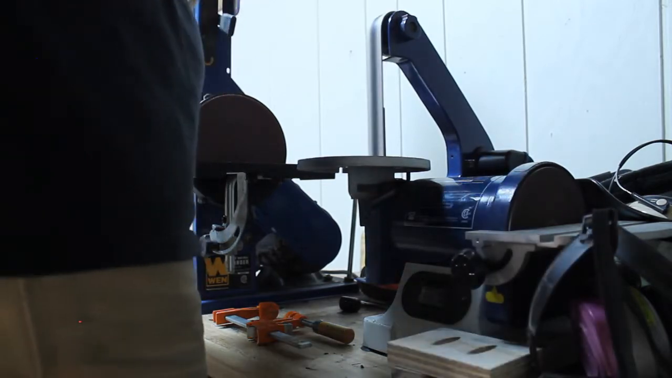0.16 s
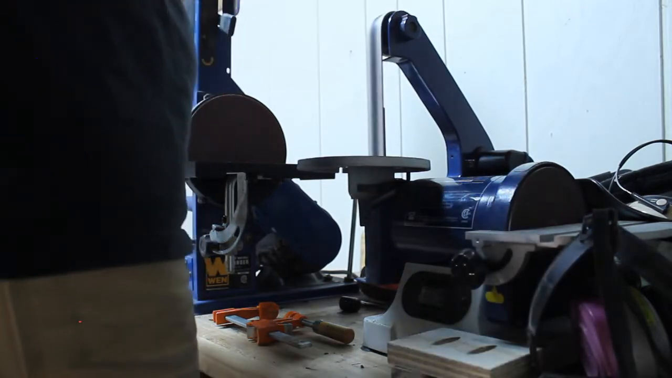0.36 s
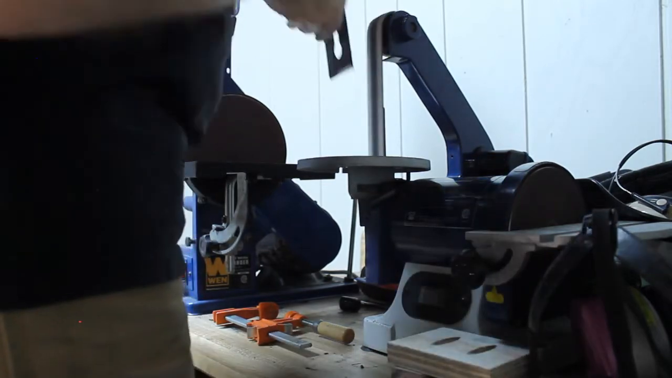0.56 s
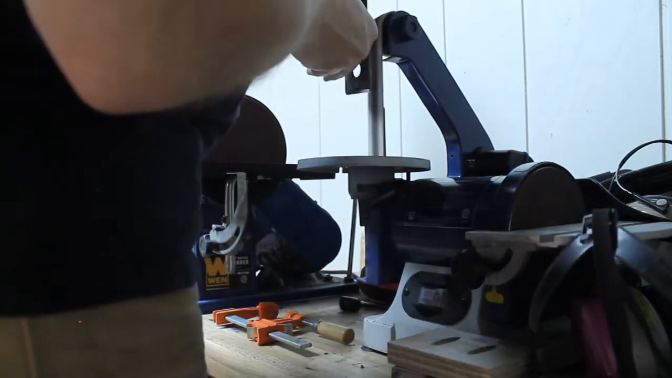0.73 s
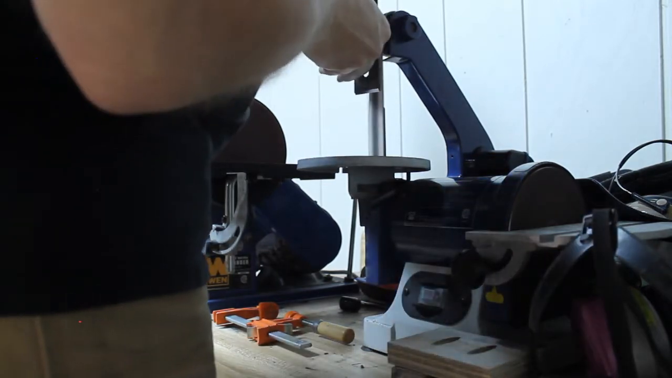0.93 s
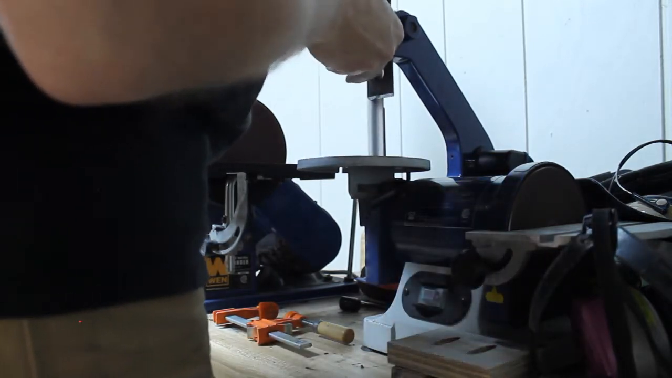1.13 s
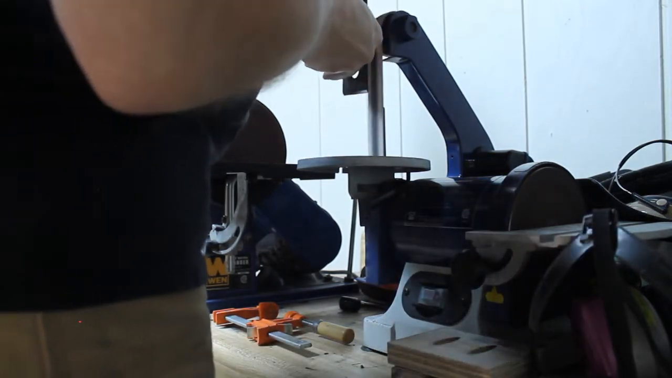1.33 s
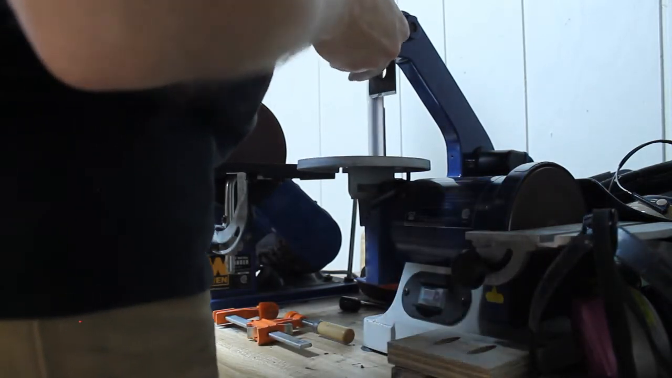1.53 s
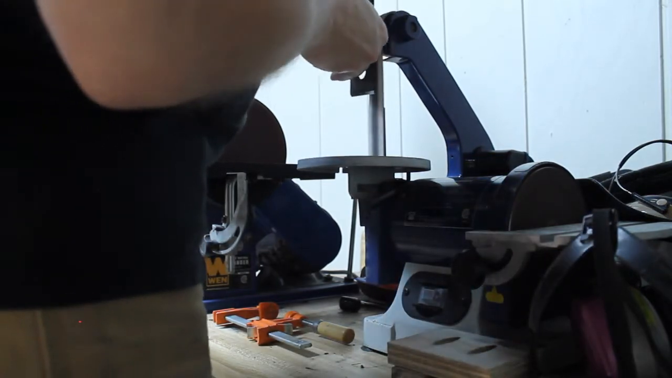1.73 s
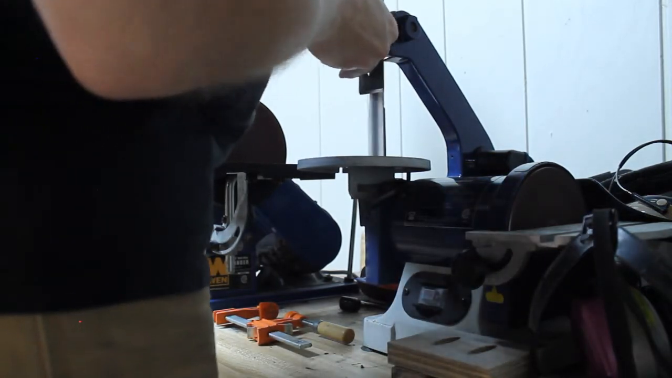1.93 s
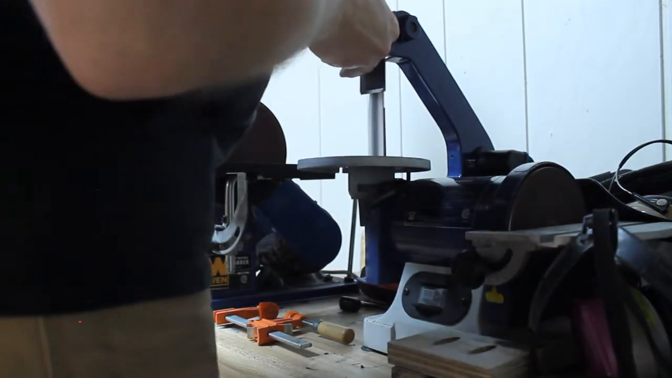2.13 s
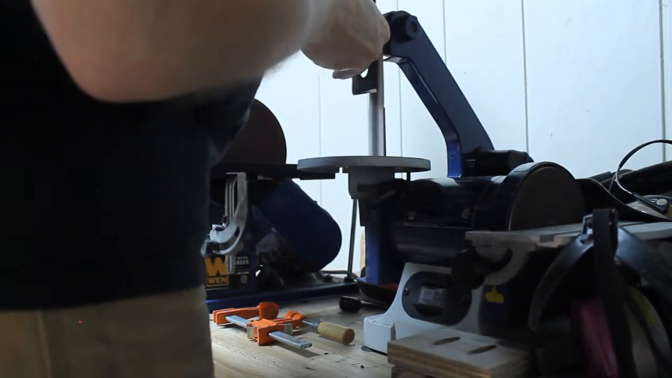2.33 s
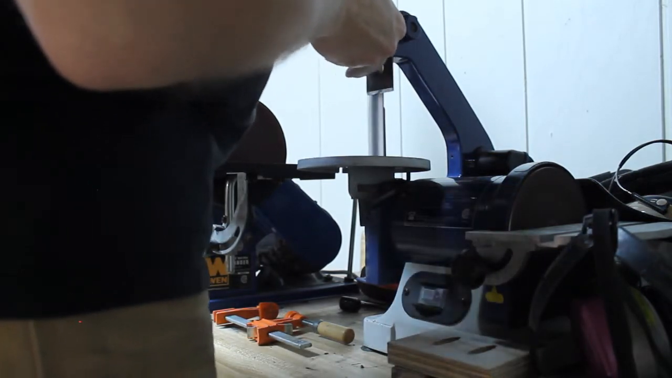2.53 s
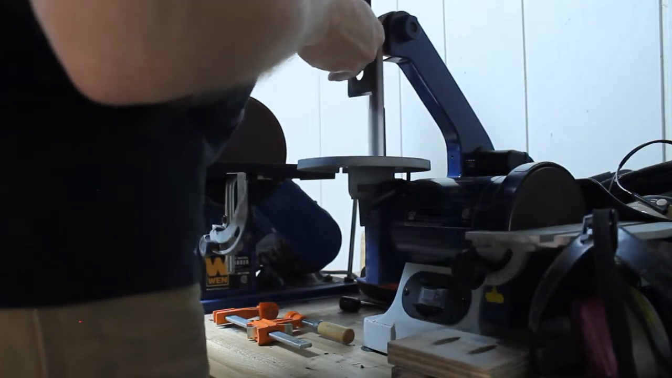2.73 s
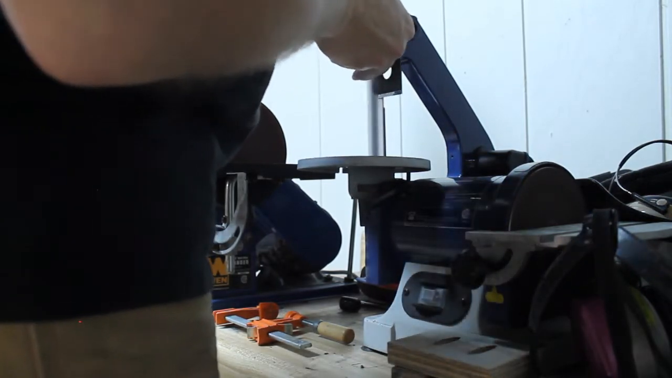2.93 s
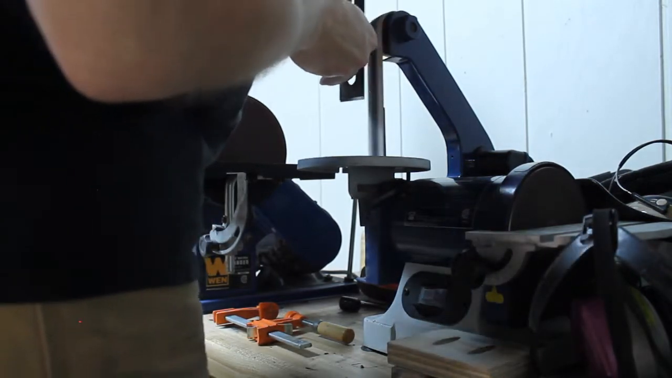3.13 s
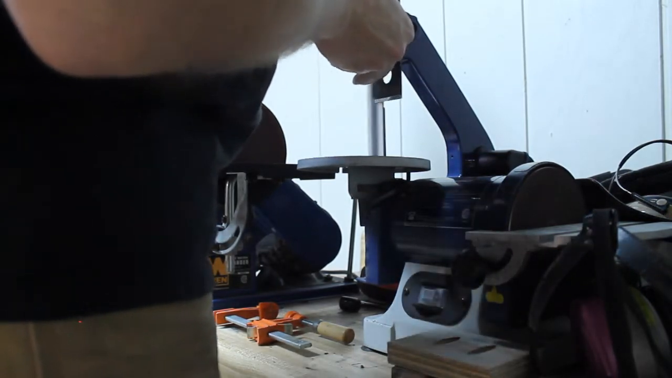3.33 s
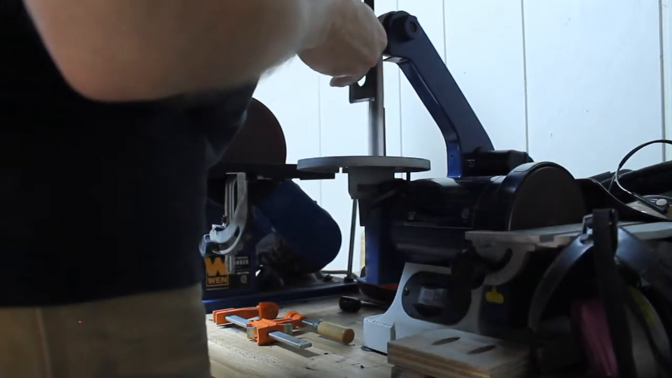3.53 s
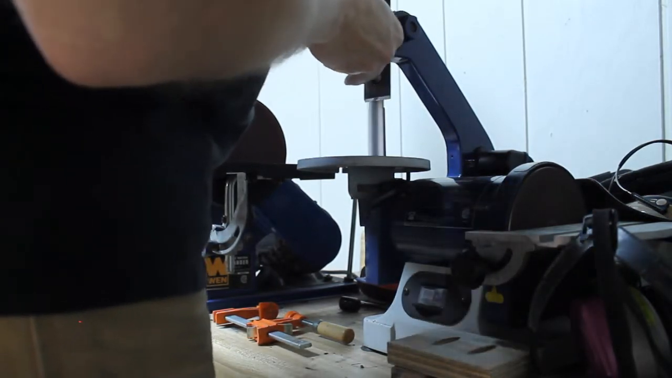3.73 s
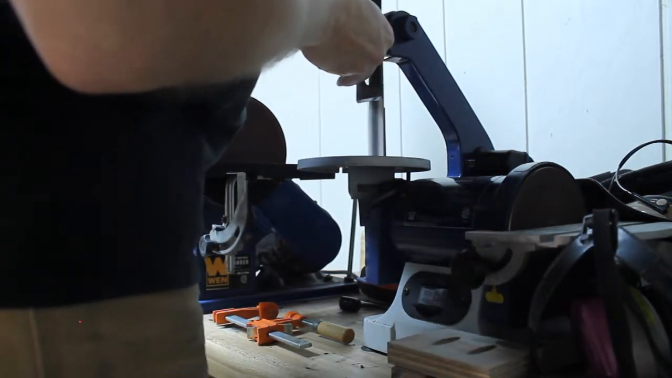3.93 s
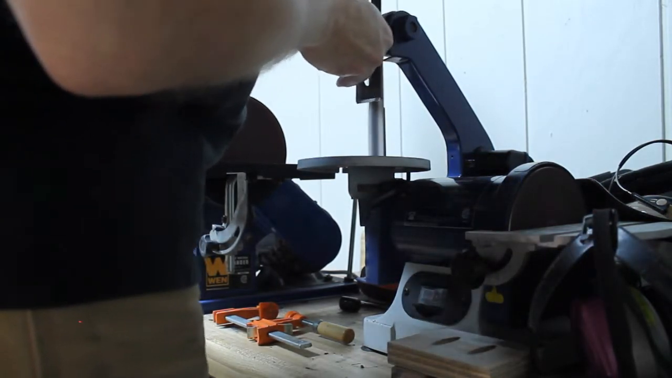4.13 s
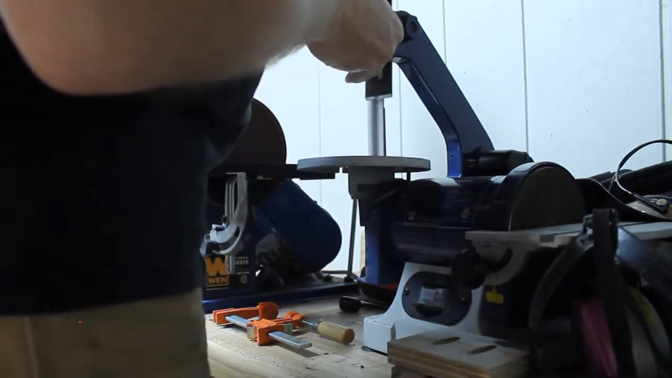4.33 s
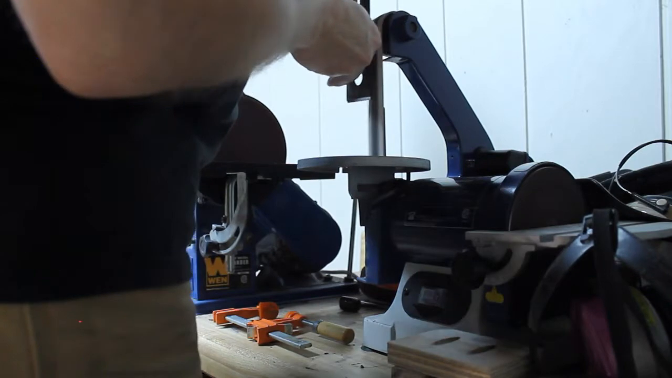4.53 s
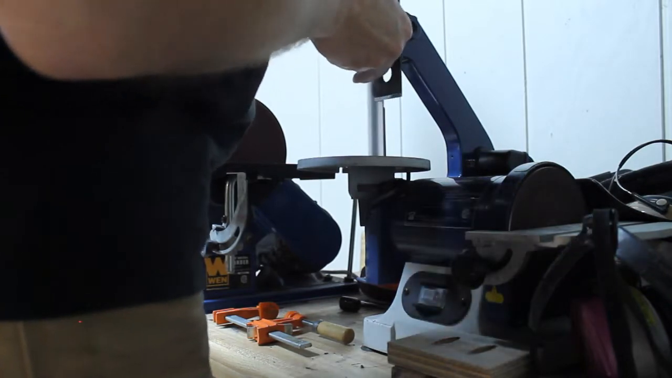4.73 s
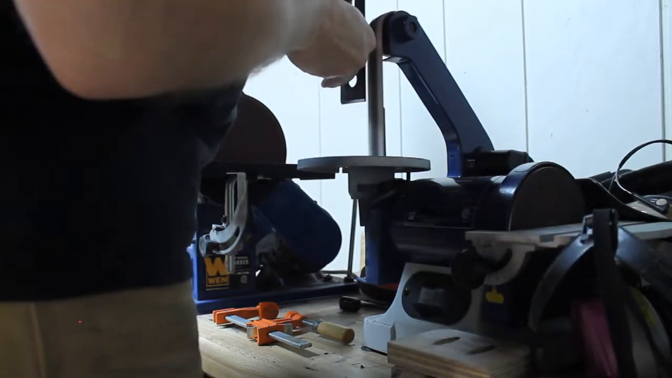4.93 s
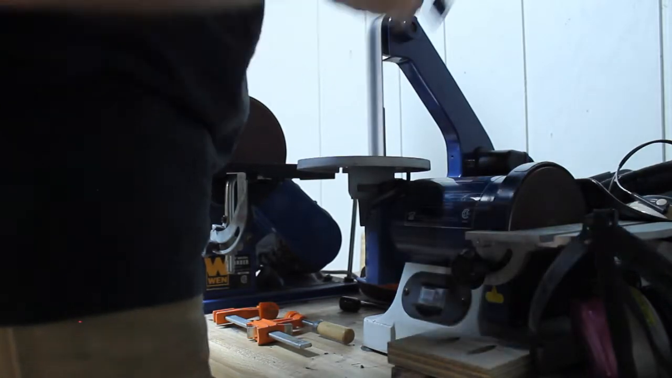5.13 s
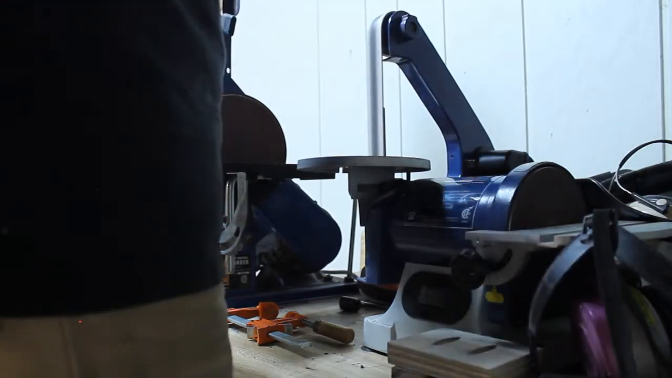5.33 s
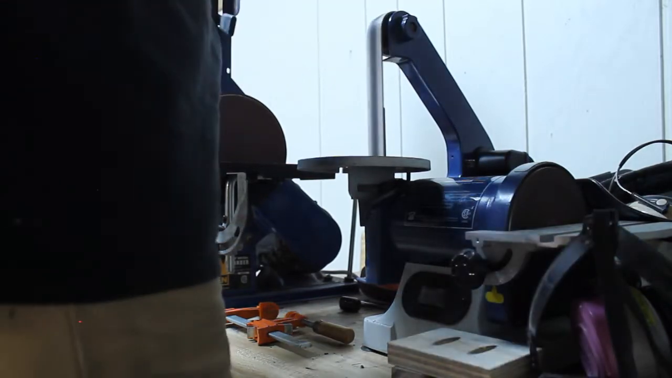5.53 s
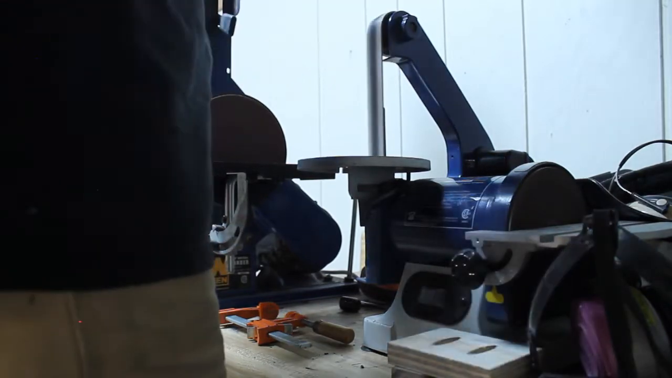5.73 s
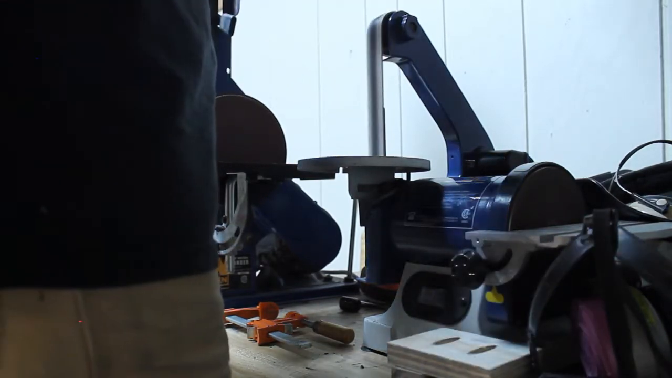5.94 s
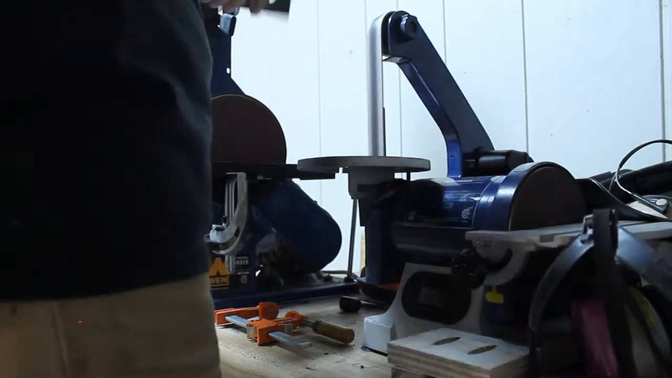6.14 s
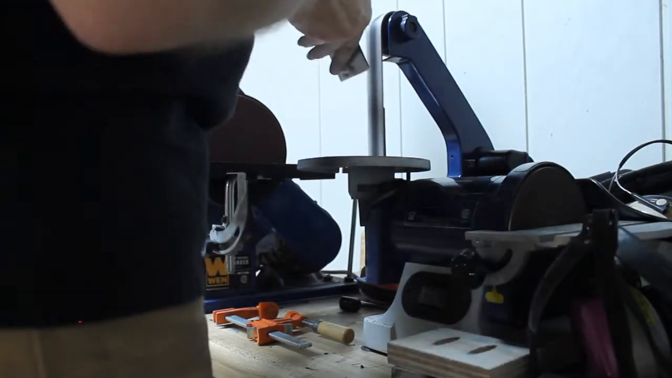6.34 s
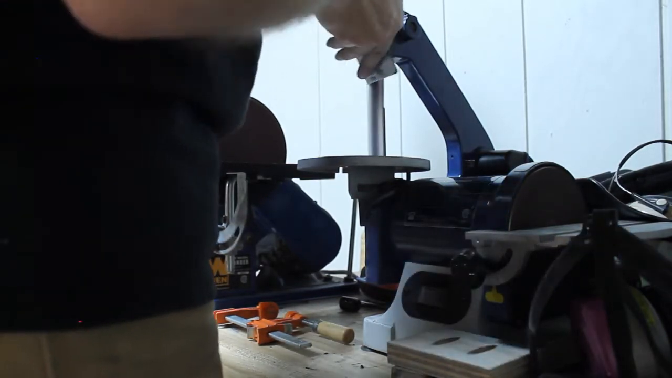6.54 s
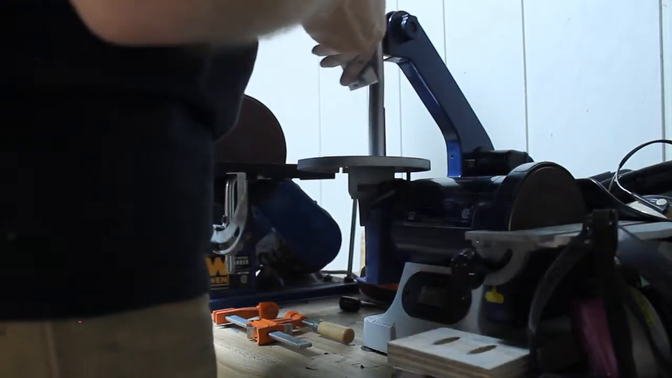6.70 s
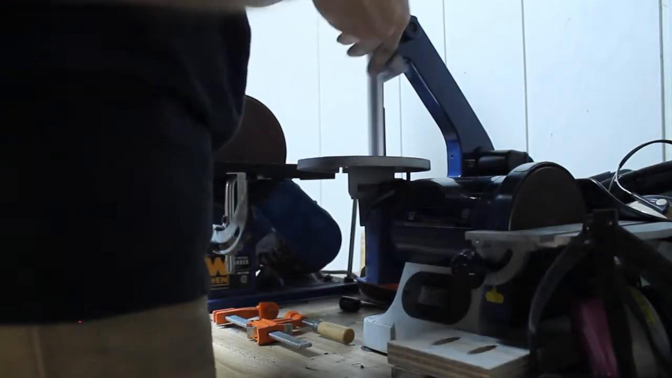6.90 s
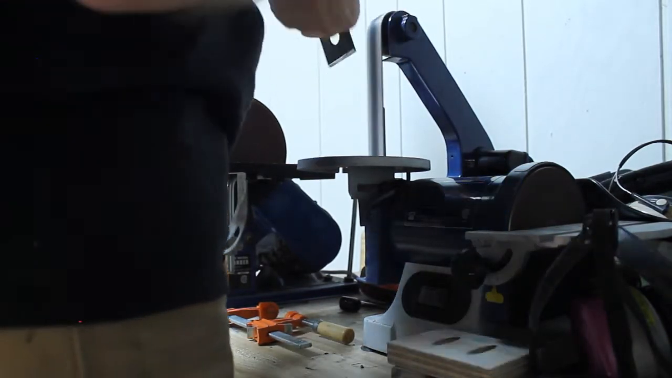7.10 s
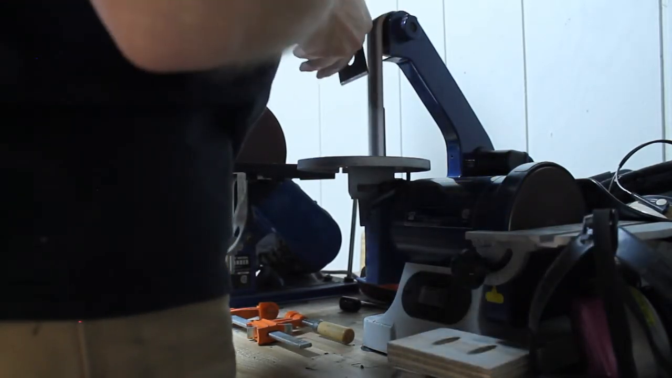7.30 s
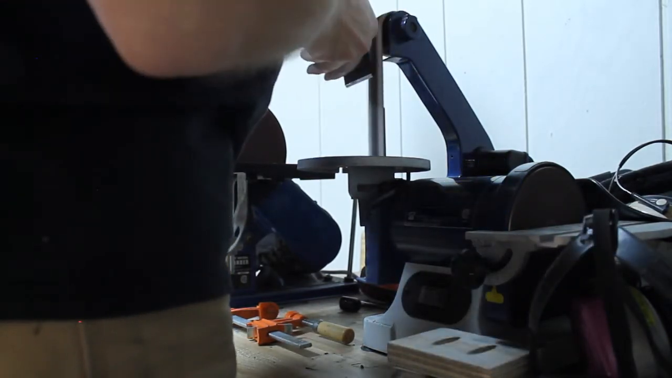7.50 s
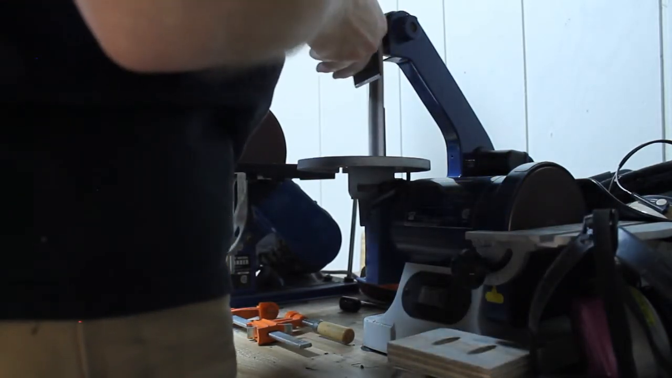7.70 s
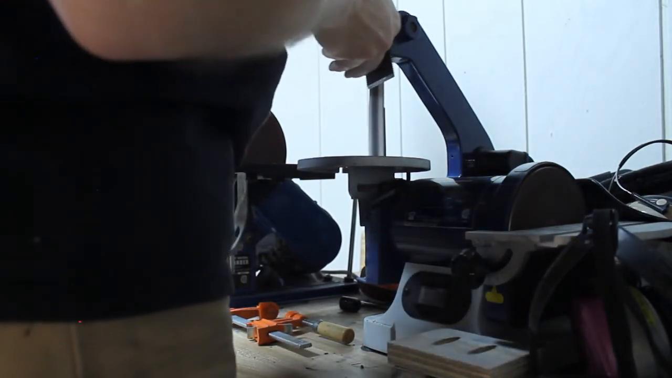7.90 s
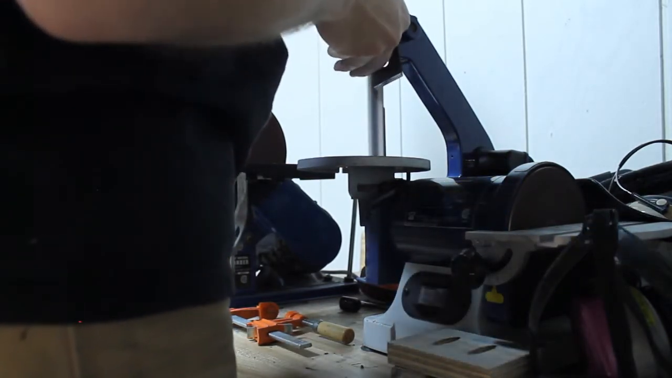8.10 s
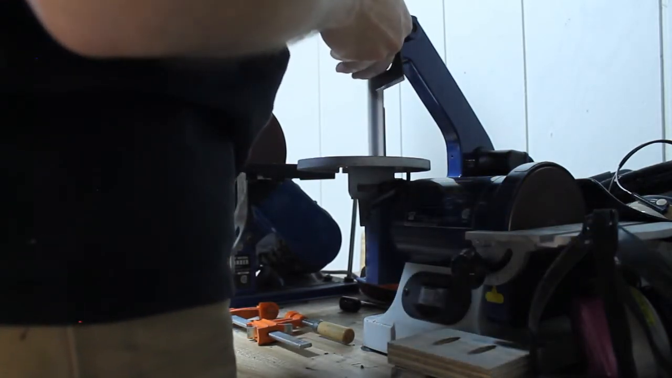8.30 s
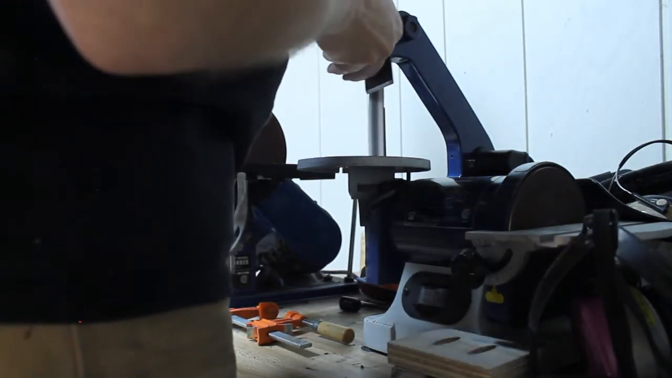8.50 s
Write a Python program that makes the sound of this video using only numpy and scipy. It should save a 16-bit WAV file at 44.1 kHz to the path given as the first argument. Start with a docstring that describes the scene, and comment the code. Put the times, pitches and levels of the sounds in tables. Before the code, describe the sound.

A faint, jittery machine noise opens: droning wheels, low hum, shrill fluttering bearing whine and a gritty blade scrape, stitched from tiny fragments. After seven seconds the same grinder suddenly becomes much louder and smooth, with rough rasp, fine hiss and a brief metallic ring from the blade. Near, dry workshop sound, ending abruptly while still running.

```python
"""A small belt grinder runs on a workshop bench while a hand strokes a blade along the leather belt.
Wheel flaws and noise ring the frame; a hum, tonal knocks and two bands of ball-pass whine run with them.
The blade adds rasp, fine hiss and a brief ring; a bright sizzle lies above the whine.
Up to 7.175 s the sound is spliced from short pieces, as in a speed-up, and turned down 20 dB.
Then it cuts to one unbroken stretch at full level."""
import sys
import numpy as np
from scipy import signal
from scipy.fft import rfft, irfft
from scipy.io import wavfile
from scipy.ndimage import uniform_filter1d

SR = 44100
rng = np.random.default_rng(int(sys.argv[2]) if len(sys.argv) > 2 else 0)


def to_linear_factor(level_db):
    """Convert decibel levels (scalar or array-like) to linear amplitude factors."""
    exponent = np.asarray(level_db, float) / 20
    return 10 ** exponent


def master(y):
    """Save y as 16-bit WAV."""
    cut = np.clip(np.atleast_2d(y).T, -1, 1)
    pcm = np.round(cut * 32767)  # scale
    wavfile.write(sys.argv[1], SR, pcm.astype(np.int16))


N = 377496
CUT_S, TURNED_DOWN_DB = 7.175, -20
PIECE_S, FIRST_JOIN_S, FADE_S, SEEK_S = 0.03202, 0.0116, 0.008, 0.012


def evened(x):
    """Scales to rms 1."""
    return x / rms(x)


def rms(x):
    """Root mean square along the last axis."""
    return np.sqrt(np.mean(abs(x) ** 2, axis=-1, keepdims=True))


def coloured(x, spectrum):
    """Filters by (freq_hz, density_db) points, straight in dB over log frequency; rms 1."""
    hz, db = np.transpose(spectrum)
    f = np.fft.rfftfreq(N, 1 / SR)
    gain_db = np.interp(np.log(f + 1), np.log(hz), db, -100, -100)
    return evened(irfft(rfft(x) * to_linear_factor(gain_db), N))


def patchy(patch_db, flicker_db):
    """White noise with drifting time-frequency patches and a flicker shared by all bands."""
    real, imag, patch = rng.standard_normal((N // 128 + 5, 257, 3)).T
    patch = uniform_filter1d(uniform_filter1d(patch, size=8, axis=0), size=20, axis=1)
    flicker = evened(uniform_filter1d(rng.standard_normal(real.shape[1]), size=8))
    level_db = patch_db * patch / patch.std() + flicker_db * flicker
    noise = signal.istft((real + 1j * imag) * to_linear_factor(level_db), nperseg=512, noverlap=384)[1]
    return evened(noise[:N])


def tones(lines, width_hz, steady, drift_hz):
    """Lines part steady, part fluttering in level and phase, each drifting slowly in pitch; rms 1."""
    hz, db = np.transpose(lines)
    step = 64  # samples per control value
    keep = np.exp(-np.pi * width_hz * step / SR)
    real, imag = rng.standard_normal((N // step + 2, len(hz), 2)).T
    flutter = evened(signal.lfilter([1], [1, -2 * keep, keep ** 2], real + 1j * imag))
    swing = steady + np.sqrt(1 - steady ** 2) * flutter
    drift = evened(uniform_filter1d(rng.standard_normal(real.shape), size=200, axis=1))
    swing = swing * np.exp(2j * np.pi * drift_hz * np.cumsum(drift, axis=1) * step / SR)
    t = np.arange(N) / SR
    out = np.zeros(N)
    for f, gain, s, start in zip(hz, to_linear_factor(db), swing, rng.random(len(hz))):
        carrier = np.exp(2j * np.pi * (f * t + start))
        out += gain * (np.repeat(s, step)[:N] * carrier).real
    return evened(out)


def hold(start_s, length_s, fade_s):
    """Rises to 1 around the start, holds, and falls around the end."""
    t = np.arange(N) / SR
    return np.clip(np.minimum(t - start_s, start_s + length_s - t) / fade_s + 0.5, 0, 1)


def wheel_flaws():
    """Flaws on the wheels come round each turn; the belt wanders, so the pattern slowly changes."""
    turn = np.arange(N) * 22.49 / SR  # turns per second over SR
    flaws = rng.standard_normal((2, 2000))
    at = (turn % 1 * 2000).astype(int)
    wear_rad = turn / 40
    return np.cos(wear_rad) * flaws[0, at] + np.sin(wear_rad) * flaws[1, at]


# rumble through frame and bench: [freq_hz, density_db]
DRONE_SPECTRUM = [(24, -52), (40, -23), (60, -27.5), (88, -22), (125, -16.5), (270, -12), (480, -12.5),
                  (650, -9), (900, -7), (1300, -4.5), (1750, -7.5), (2000, -14), (2600, -40.5)]
# frame resonances: [freq_hz, width_hz, over_rumble_db]
FRAME_MODES = [(170, 18, 7), (222.73, 32.6, 5.5), (364, 105, 4), (457.1, 22, 5), (533.7, 24, 5),
               (603.05, 29, 6), (723, 150, 3), (833, 25, 3.5), (992.6, 16.6, 1.5), (1073.6, 35, 8.5),
               (1143, 16, 8), (1212.6, 54, 1.5), (1423, 40, 3.5), (1533.2, 47, 8.5), (1616, 83, 7),
               (1815, 40, 2.5)]


def turning_wheels():
    """Wheel flaws and fresh rumble ring the resonances of the frame."""
    f = np.fft.rfftfreq(N, 1 / SR)
    power = 1 + sum(to_linear_factor(2 * db) / (1 + (2 * (f - hz) / width_hz) ** 4) for hz, width_hz, db in FRAME_MODES)
    rumble = coloured(0.89 * wheel_flaws() + patchy(1.33, 0.65), DRONE_SPECTRUM)
    return evened(irfft(rfft(rumble) * np.sqrt(power), N))


# strongest tones of wheels and frame: [freq_hz, relative_db]
KNOCK_LINES = [(360.7, -54.5), (538.3, -57), (607, -47.5), (721.4, -50), (877.5, -53), (942.1, -52.5),
               (990.5, -51), (1071, -42), (1147, -42.5), (1190, -50.5), (1351, -53.5), (1443, -51),
               (1529, -47), (1592, -48), (1642, -45), (1820, -55), (2067, -48.5), (2223, -53), (2444, -63)]


def wheel_knocks():
    """Narrow, mostly steady tones of wheels and frame."""
    return tones(KNOCK_LINES, width_hz=4, steady=0.85, drift_hz=0)


# hum partials: [multiple_of_hum, peak_db before the turn-down]
HUM_PARTIALS = [(1, -39.5), (2, -41)]


def steady_hum():
    """Sum of fixed cosines at multiples of one hum frequency."""
    t, hum_hz = np.arange(N) / SR, 106.4
    return sum(to_linear_factor(db) * np.cos(2 * np.pi * k * hum_hz * t) for k, db in HUM_PARTIALS)


# noise around the upper whine: [freq_hz, density_db]
UPPER_RUSH = [(3650, -40), (6200, -23), (6440, -4), (6950, -5), (7140, -1), (7460, 1), (8600, -13),
              (11200, -33.5), (18900, -120)]
# upper ball-pass tones with side lines: [freq_hz, relative_db]
UPPER_LINES = [(6422, -48), (6551, -40), (6638, -38), (6735, -45), (6853, -41), (6988, -38), (7074, -43),
               (7278, -31), (7418, -30), (7477, -40), (7612, -40.5), (7720, -36), (7849, -35), (7930, -41),
               (8150, -47), (8280, -47.5)]


def upper_whine():
    """Upper ball-pass tones of the bearings, fluttering within a band of noise."""
    rush = coloured(patchy(1.5, 1.1976), UPPER_RUSH)
    return to_linear_factor(-5) * rush + to_linear_factor(-1.5) * tones(UPPER_LINES, width_hz=24, steady=0.35, drift_hz=6)


# noise around the lower whine: [freq_hz, density_db]
LOWER_RUSH = [(2590, -31), (4400, -7), (5090, -2), (6300, -7.5), (8190, -21.5), (13900, -120)]
# lower ball-pass tones: [freq_hz, relative_db]
LOWER_LINES = [(3822, -44), (3957, -46.5), (4258, -45.5), (4323, -56.5), (4689, -44), (4823, -42.5),
               (5125, -36.5), (5243, -43), (5556, -42), (5669, -41), (5986, -44), (6115, -46.5),
               (6239, -47)]


def lower_whine():
    """Lower ball-pass tones of the bearings, fluttering within a band of noise."""
    rush = coloured(patchy(1.2, 0.88), LOWER_RUSH)
    return to_linear_factor(-1.5) * rush + to_linear_factor(-1.5) * tones(LOWER_LINES, width_hz=18, steady=0.4, drift_hz=4)


def blade_scrape(spectrum, grit_share, repeat, flicker_db):
    """Dense grit clicks and the beat of the wheels over a flickering hiss."""
    click_db = 5.7 * np.minimum(rng.exponential(1, N), 3)
    hit = rng.random(N) < 1500 / SR  # mean clicks per second over SR
    grit = evened(rng.standard_normal(N) * to_linear_factor(click_db) * hit)
    return coloured(patchy(2.0, flicker_db) + grit_share * grit + repeat * wheel_flaws(), spectrum)


# blade chattering on the leather: [freq_hz, density_db]
RASP_SPECTRUM = [(1500, -13), (1900, -5), (2030, 3.5), (2230, 1.5), (2290, 0), (2450, 0), (2600, -2),
                 (3200, -3.5), (3300, -5.5), (3430, 0), (3560, -5.5), (3700, -4), (4100, -9), (4500, -12.5),
                 (5800, -9.5)]


def blade_rasp():
    """The blade chatters on the leather, strongly marked by the turning wheels."""
    return blade_scrape(RASP_SPECTRUM, grit_share=0.28, repeat=1.0, flicker_db=0.74)


# fine hiss of leather on steel: [freq_hz, density_db]
HISS_SPECTRUM = [(4000, -4), (6000, -2.5), (9000, -2), (11000, -1.5), (13000, -1), (13300, -12),
                 (13700, -2.5), (15700, -5)]


def leather_hiss():
    """Leather slides on steel: a finer scrape, only faintly marked by the wheels."""
    return blade_scrape(HISS_SPECTRUM, grit_share=0.3, repeat=0.12, flicker_db=1.47)


# bright band above the whine: [freq_hz, density_db]
SIZZLE_SPECTRUM = [(8300, -18), (8600, -6), (8950, 0), (9120, -1.5), (9210, 2.5), (9300, 2), (9620, -1),
                   (9850, -1.5), (10250, -13), (10600, -25)]
# thin tones in the bright band: [freq_hz, relative_db]
SIZZLE_LINES = [(8920, -51), (9211, -43), (9335, -52), (10444, -57)]


def bright_sizzle():
    """Band of patchy noise with thin fluttering tones in it."""
    band = coloured(patchy(1.1, 0.75), SIZZLE_SPECTRUM)
    return band + to_linear_factor(-12.5) * tones(SIZZLE_LINES, width_hz=20, steady=0.2, drift_hz=8)


# how the blade lies on the belt, before waver, jumps and turn-down:
# [time_s, rasp_db, upper_whine_db, sizzle_db]
CONTACT_LEVELS = [(0.0, -26, -22, -34), (0.1, -26.4, -24.5, -36.5), (0.3, -29, -18.6, -26.5),
                  (0.68, -27, -24.9, -38), (0.9, -25.5, -23, -32.5), (1.02, -30.5, -18.5, -34),
                  (1.12, -25, -23.5, -33.8), (1.48, -27.5, -19.9, -32.5), (2.28, -25, -24.5, -34),
                  (2.58, -30.5, -17.5, -30), (2.68, -25.5, -24, -34.1), (2.96, -25, -25.5, -35.1),
                  (3.14, -27, -20.2, -33.5), (3.52, -31, -18.5, -29), (4.1, -24, -23.5, -35),
                  (4.52, -26, -22, -33), (4.68, -26.7, -21, -37.1), (4.86, -25, -22, -33.5),
                  (5.34, -29, -20.5, -32), (5.44, -28, -19.5, -33), (5.82, -30.3, -19.5, -30.4),
                  (5.92, -27, -24.5, -35.4), (6.4, -28.2, -19, -35.5), (6.5, -25.2, -21.5, -31.9),
                  (6.78, -29, -20.9, -36), (6.88, -23.5, -25, -31.2), (7.0, -28.5, -21.7, -36.5),
                  (7.18, -28.1, -19.5, -36), (7.8, -25.0, -21.5, -32.5), (8.18, -30, -17.5, -33),
                  (8.32, -24, -24.5, -33), (8.56, -28, -19, -34)]
# sudden changes of blade contact, mostly one piece long: [start_s, length_s, rasp_db, upper_whine_db]
CONTACT_JUMPS = [(0.009, .032, -0.5, -6.5), (0.08, 0.037, -1.5, -4), (.204, 0.03, 1.5, -5),
                 (.876, .032, 0.5, -1), (1.516, .032, -3.5, 0.5), (2.351, .032, 1, -0.5),
                 (2.608, .032, 4, -3.5), (3.31, .032, -4, 2), (3.413, 0.037, 3, -1), (3.694, 0.03, 2, -1),
                 (3.79, .032, -3, 2.5), (3.822, 0.029, 3.5, -3), (4.012, .032, -3, 1.5),
                 (4.462, 0.039, 1, -4), (4.526, .032, 0, -4), (5.101, .032, -3.5, 1.5),
                 (5.265, 0.039, 0, -5), (5.327, .032, 1.5, -8), (5.455, .032, 0.5, -3.5),
                 (5.905, 0.13, -0.5, -2.5), (6.257, 0.033, 1, -3.5), (6.736, .064, -1, 1),
                 (6.798, .032, 1.5, -6), (6.992, .032, 0.5, -7), (7.99, 0.27, -2.5, 0.5)]


def blade_contact(source):
    """Blade pressure wavers by chance, rasp rising as the whine sinks; gives each layer's dB per piece."""
    t, waver_s = np.arange(N) / SR, 0.067
    waver = uniform_filter1d(rng.standard_normal((N, 2)).T, size=round(waver_s * SR), axis=1)
    pressure, sparkle = evened(waver)[:, source]  # each piece catches another moment
    time_s, *columns = np.transpose(CONTACT_LEVELS)
    rasp_db, whine_db, sizzle_db = (np.interp(t, time_s, column) for column in columns)
    jump_db = sum(np.outer(dbs, hold(start_s, length_s, FADE_S))
                  for start_s, length_s, *dbs in CONTACT_JUMPS)
    rasp_db = rasp_db + 1.03 * pressure + jump_db[0]
    whine_db = whine_db - 0.64 * pressure + jump_db[1]
    sizzle_db = sizzle_db + 0.63 * sparkle

    def follow(mean_db, per_rasp, per_whine, per_sizzle):
        """Level that moves with the three driving levels, in dB per dB off their means."""
        return (mean_db + per_rasp * (rasp_db + 27) + per_whine * (whine_db + 21)
                + per_sizzle * (sizzle_db + 33))

    drone_db = follow(-25.5, 0.18, -0.31, -0.1471)
    low_db = follow(-26.5, 0.57, 0.6, -0.3236)
    hiss_db = follow(-32.5, 0.41, -0.23, 0.28)
    return drone_db, whine_db, low_db, rasp_db, sizzle_db, hiss_db


def splices(machine):
    """Source sample and cross-fade weight of the outgoing and the incoming piece."""
    t = np.arange(N) / SR
    place = (np.minimum(t, CUT_S) - FIRST_JOIN_S + FADE_S / 2) / PIECE_S + 1
    piece = place.astype(int)
    joins = np.searchsorted(piece, np.arange(piece.max() + 1))
    fade, seek = round(FADE_S * SR), round(SEEK_S * SR)
    skip = [0]
    for at, chance in zip(joins, rng.random(len(joins))):
        # jump to a random spot, then slide to where the wave best continues the piece that ends
        spot = int(chance * (N - 2 * SR))
        ending = machine[at + skip[-1]:][:fade]
        likeness = signal.correlate(machine[spot:spot + fade + seek], ending, "valid")
        skip.append(spot + np.argmax(likeness) - at)
    skip = np.array(skip)
    rise = np.clip((place - piece) * PIECE_S / FADE_S, 0, 1)
    source = np.arange(N) + np.array([skip[piece], skip[piece + 1]])
    return np.clip(source, 0, N - 1), np.array([1 - rise, rise])


# tones of the blade: [freq_hz, relative_db]
BLADE_LINES = [(3451, 3), (3400, -7)]


def blade_sings():
    """The blade rings for a moment in fluttering tones."""
    ring = tones(BLADE_LINES, width_hz=25, steady=0.2, drift_hz=3.03)
    return to_linear_factor(-37) * hold(start_s=7.56, length_s=0.4, fade_s=0.05) * ring


def scene():
    """Both pieces read the running machine at their own place and are cross-faded."""
    drone = turning_wheels() + to_linear_factor(-6) * wheel_knocks()
    hum, whine, low = steady_hum(), upper_whine(), lower_whine()
    machine = drone + to_linear_factor(24.5) * hum + to_linear_factor(-3) * whine + to_linear_factor(-6) * low  # guides the joins only
    source, weight = splices(machine)
    drone_db, whine_db, low_db, rasp_db, sizzle_db, hiss_db = blade_contact(source)
    wheels = to_linear_factor(drone_db) * drone[source] + hum[source]
    bearings = to_linear_factor(whine_db) * whine[source] + to_linear_factor(low_db) * low[source]
    blade = to_linear_factor(rasp_db) * blade_rasp()[source] + to_linear_factor(hiss_db) * leather_hiss()[source]
    sizzle = to_linear_factor(sizzle_db) * bright_sizzle()[source]
    pieces = wheels + bearings + blade + sizzle + blade_sings()
    volume = to_linear_factor(np.where(np.arange(N) / SR < CUT_S, TURNED_DOWN_DB, 0))
    return (volume * (pieces * weight).sum(0))[None]


def low_pass(x):
    """Removes everything above the highest recorded frequency."""
    return signal.sosfilt(signal.butter(12, 16620, fs=SR, output="sos"), x)


def record(dry):
    """Returns the finished mix as stored."""
    return low_pass(dry)


dry = scene()
out = record(dry)
master(out)
```